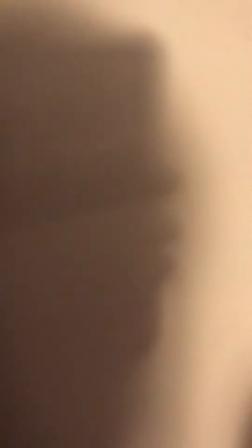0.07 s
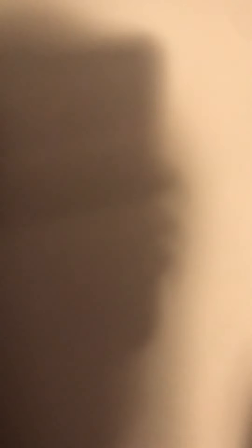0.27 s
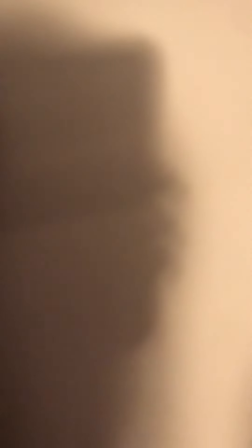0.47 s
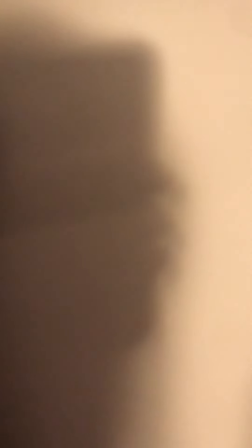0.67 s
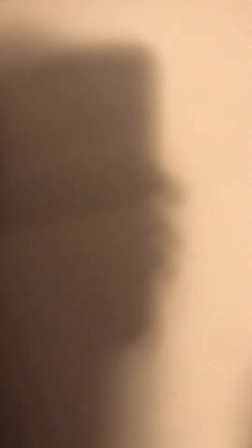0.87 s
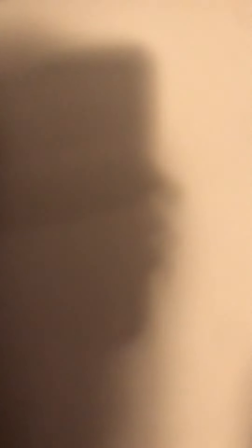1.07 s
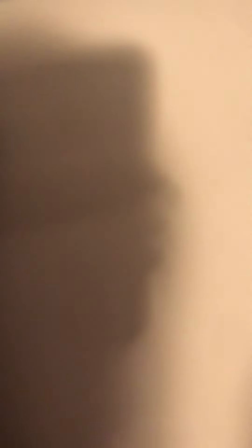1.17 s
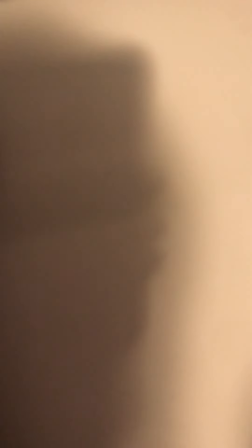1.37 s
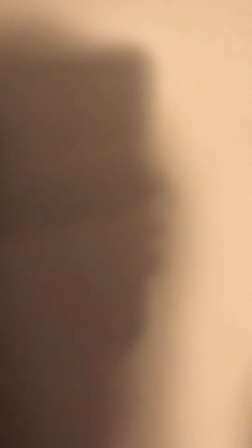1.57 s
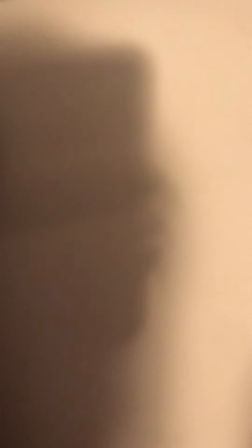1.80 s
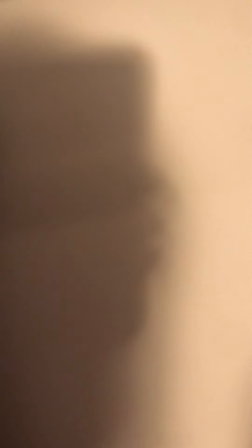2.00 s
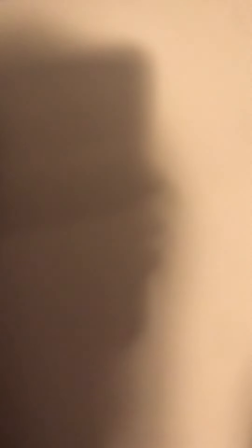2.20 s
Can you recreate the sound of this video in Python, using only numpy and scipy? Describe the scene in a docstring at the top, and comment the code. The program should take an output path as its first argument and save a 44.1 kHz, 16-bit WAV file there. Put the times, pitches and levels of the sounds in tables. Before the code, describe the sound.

Small magnets clack sharply onto a hard, briefly ringing panel at about 0.25 seconds, loudest near 0.3, then bounce faster and softer until 0.55 with a bright, gritty crackle. At 1.15 one is set down softly and slides with a short scrape, snapping onto the others around 1.55 in a quickening metallic chatter. Faint handling ticks follow until 2.2, all close by over a small room's low hum.

```python
"""Small magnets clack onto a hard panel and bounce to rest, close by in a small room.
Each hit makes the panel ring, and a fine, bright, gritty crackle trails the clacks.
One magnet is set down and slid along, catching on the surface, until it snaps onto the others
with a quickening metallic chatter. Faint handling taps follow over a low room hum."""
import sys
import numpy as np
from scipy import signal
from scipy.fft import rfft, irfft
from scipy.io import wavfile

SR = 44100
rng = np.random.default_rng(int(sys.argv[2]) if len(sys.argv) > 2 else 0)


def output_pcm(signal):
    """Save a mono or channel-first signal as 16-bit PCM at the path in sys.argv[1].

    Samples are clipped to [-1, 1] before scaling.
    """
    pcm = np.clip(np.atleast_2d(signal).T, -1, 1) * 32767
    wavfile.write(sys.argv[1], SR, np.round(pcm).astype(np.int16))


N = 99048
TAIL = int(.8 * SR)  # samples allowed for a ring or an echo to die away


def amp(db):
    """Turn decibels (dB) into a number to multiply a sound by."""
    return 10 ** (np.asarray(db) / 20)


def unit(x):
    """Scale a sound so its average power is 1."""
    return x / np.sqrt(np.mean(x ** 2))


def along(hz, points):
    """Read between (Hz, value) points, giving every octave equal space."""
    freqs, values = np.array(points, float).T
    return np.interp(np.log(np.maximum(hz, 1)), np.log(freqs), values)


def through(x, response):
    """Give every sample of a sound the same ring or echo."""
    return signal.fftconvolve(x, response)[:len(x)]


def tone(x, points, size=4096):
    """Turn bass and treble up or down, following (Hz, dB) points."""
    gains = amp(along(np.fft.rfftfreq(size, 1 / SR), points))
    # build the shortest click that has this tone
    cepstrum = irfft(np.log(gains))
    cepstrum[1:size // 2] *= 2
    cepstrum[size // 2 + 1:] = 0
    click = irfft(np.exp(rfft(cepstrum)))
    return through(x, click)


def add(out, start, x):
    """Mix x into out at a start time in seconds."""
    i = int(np.clip(round(start * SR), 0, len(out) - 1))
    out[i:i + len(x)] += x[:len(out) - i]


def fade(fade_s):
    """A curve with total energy 1 that drops 60 dB over its fade time."""
    curve = np.exp(-np.log(1000) * np.arange(TAIL) / SR / fade_s)
    return curve / np.sqrt(np.sum(curve ** 2))


def ring(notes):
    """A struck object rings with several notes, each fading at its own speed."""
    t = np.arange(TAIL) / SR
    return sum(amp(db) * np.sqrt(2) * fade(fade_s) * np.cos(2 * np.pi * hz * t)
               for hz, db, fade_s in notes)


def magnet_ring(notes, hz):
    """A small magnet rings at multiples of its main pitch."""
    return ring([(k * hz, db, fade_s) for k, db, fade_s in notes if k * hz < SR / 2])


def clatter(fade_s):
    """Countless short notes blur into a quick burst of noise."""
    return fade(fade_s) * rng.standard_normal(TAIL)


def direct():
    """The sound that comes straight to the microphone."""
    return signal.unit_impulse(TAIL)


def echoes(table):
    """Nearby surfaces each send back one late copy of the sound."""
    out = np.zeros(TAIL)
    for ms, db in table:
        add(out, ms / 1000, amp([db]))
    return out


# The tone of the room's steady noise. Each row: frequency in Hz, relative level in dB.
BACKGROUND_TONE = [(25, -24), (40, -14), (58, -3), (90, -6), (135, -5), (190, -11), (300, -13.5),
                   (500, -24), (1200, -24), (3000, -28), (8000, -31.5), (16000, -36)]

def background(noise_db=-68, hum_hz=58, hum_db=-70.5):
    """Quiet room noise with a low hum."""
    noise = unit(tone(rng.standard_normal(N), BACKGROUND_TONE))
    hum = np.sqrt(2) * np.sin(2 * np.pi * hum_hz * np.arange(N) / SR)
    return amp(noise_db) * noise + amp(hum_db) * hum


# How long sound lingers in the room. Each row: frequency in Hz, fade time in seconds.
ROOM_FADES = [(100, .42), (220, .27), (450, .24), (900, .27), (2000, .29), (4000, .26), (8000, .19),
              (15000, .14)]

def room(delay_s=.0026, rise_s=.004):
    """Echoes from the walls blend into a tail whose treble dies first."""
    noise = rfft(rng.standard_normal(TAIL))
    hz = np.fft.rfftfreq(TAIL, 1 / SR)
    centres, fades = zip(*ROOM_FADES)
    tail = np.zeros(TAIL)
    for share, fade_s in zip(np.eye(len(centres)), fades):
        band = along(hz, list(zip(centres, share)))
        tail += irfft(noise * band, TAIL) * fade(fade_s)
    elapsed = np.maximum(np.arange(TAIL) / SR - delay_s, 0)
    return tail * (1 - np.exp(-elapsed / rise_s))


# Magnets shifting between the fingers. Each row: start in seconds, level in dB, main pitch in Hz.
TICKS = [(1.3328, -27, 3040), (1.73, -36, 2980), (1.7879, -30, 3120), (2.007, -35.5, 3005),
         (2.092, -36.5, 2920)]
# The ring of a tick. Each row: multiple of the main pitch, level in dB, fade time in seconds.
TICK_NOTES = [(.4, -6, 0.0085), (1, 0, 0.0061), (1.25, -21.5, 0.0085), (1.75, -19.5, 0.0047)]

def ticks(walls, graze_s=.041, room_db=-8):
    """Magnets graze each other and ring briefly."""
    out = np.zeros(N)
    for start, db, hz in TICKS:
        graze = clatter(graze_s) + amp(room_db) * walls
        add(out, start, amp(db) * through(graze, magnet_ring(TICK_NOTES, hz)))
    return out


# How the sliding swells and fades. Each row: time in seconds, level in dB.
SLIDE_LEVELS = [(0, -67.5), (.1, -86), (.21, -71.5), (.24, -60.5), (.3, -81), (1.089, -80.5),
                (1.135, -64.5), (1.25, -70), (1.299, -56.5), (1.412, -66), (1.428, -57), (1.471, -50.5),
                (1.495, -51), (1.528, -37), (1.58, -37), (1.62, -50), (1.7, -77), (1.799, -71.5),
                (1.921, -78.5), (1.987, -61.5), (2.06, -74.5), (2.111, -63), (2.19, -70), (2.25, -59)]
# The tone of the rubbing. Each row: frequency in Hz, relative level in dB.
SLIDE_TONE = [(60, -20), (250, 1.5), (380, 1), (620, 1.5), (850, 5), (1500, -6), (2500, -14.5), (3400, -17),
              (3950, -11.5), (4800, -22.5), (7000, -15.5), (8500, -22), (11500, -21), (16000, -26.5)]
# The sliding magnet's ring. Each row: pitch in Hz, relative level in dB, fade time in seconds.
SLIDE_NOTES = [(385, -6, .07), (610, -5, .05), (1500, -4, .03), (3950, -11, .02), (7000, -17, .015)]

def slide(catches_per_s=890, scatter_db=1, hiss_db=-6, ring_db=-3, rub_db=-3):
    """A magnet scrapes along: many tiny catches set it ringing over a smooth rub."""
    catches = (rng.random(N) < catches_per_s / SR) * rng.standard_normal(N)
    catches *= amp(scatter_db * rng.exponential(size=N))
    force = unit(catches) + amp(hiss_db) * rng.standard_normal(N)
    rub = amp(rub_db) * unit(tone(force, SLIDE_TONE))
    ringing = amp(ring_db) * unit(through(force, ring(SLIDE_NOTES)))
    times, levels = zip(*SLIDE_LEVELS)
    return (rub + ringing) * amp(np.interp(np.arange(N) / SR, times, levels))


# How the grit swells and fades. Each row: time in seconds, level in dB.
GRIT_LEVELS = [(0.334, -73), (.345, -40), (.37, -49), (.395, -38.5), (.43, -64), (.48, -85), (.505, -59),
               (.535, -64), (.56, -90)]
# The grit's bright tone. Each row: frequency in Hz, relative level in dB.
GRIT_TONE = [(1000, -24.5), (4000, -4), (6800, 0), (9000, -5.5), (11500, -1), (13500, -3), (16000, -11.5)]

def grit(grains_per_s=1100, grain_fade_s=.014):
    """A fine, bright, gritty crackle trails the clacks."""
    grains = (rng.random(N) < grains_per_s / SR) * rng.standard_normal(N)
    crackle = unit(tone(through(grains, clatter(grain_fade_s)), GRIT_TONE))
    times, levels = zip(*GRIT_LEVELS)
    return crackle * amp(np.interp(np.arange(N) / SR, times, levels, left=-np.inf, right=-np.inf))


def panel_ripple(delay_at_1khz_s=.000701, size=4096):
    """Ripples in the panel carry treble faster than bass, which smears each hit a little."""
    hz = np.fft.rfftfreq(size, 1 / SR)
    phase = 4 * np.pi * delay_at_1khz_s * np.sqrt(1000 * hz)
    return irfft(np.exp(-1j * phase))[:size // 4]


# What echoes and clatter lose. Each row: frequency in Hz, level change in dB.
ECHO_TONE = [(3000, -2), (5000, -1.5), (8000, -5.5), (15000, -6.5)]

def hits(table, bands_hz, body, overall_tone, clatter_db, clatter_s):
    """Each hit, hard or soft, sets off the body's ring and a short clatter."""
    out = np.zeros(N)
    for start, *levels in table:
        burst = amp(clatter_db) * tone(clatter(clatter_s), ECHO_TONE)
        add(out, start, tone(body + burst, list(zip(bands_hz, levels))))
    return tone(through(out, panel_ripple()), overall_tone)


# Soft taps in the hand or on the panel. Each row: start in seconds, then a level in dB for each band.
TAPS = [(0.0750, -26.5, -21, -40, -54), (0.2432, 5, 10, 6, -10), (0.2648, 8.5, 7.5, 1, -14),
        (1.1549, -1.5, 5.5, -11.5, -8), (1.3120, -41, -33, -37, -35), (1.3330, -14, -16, -21.5, -68),
        (1.3610, -8, -9, -29, -31.5), (1.4430, -31, -10.5, -27, -44.5), (1.4640, -7, -4.5, -30.5, -12),
        (1.5432, -1.5, 11, 4, -45), (1.5550, 7, 3.5, 1, -11), (1.5625, -2.5, 10, 4, -3),
        (1.5745, 6.5, 8, 3.5, -13), (1.5815, 8.5, 7, -2, -36), (1.5890, 0, 11, -19, -28),
        (1.6390, -8.5, -1.5, -30, -30), (1.7270, -46, -19, -36, -48), (2.1215, -26, -15.5, -43, -42),
        (2.2260, -16, -19, -40.5, -27)]
# The four bands of a tap in Hz, from bass to treble.
TAP_BANDS_HZ = [220, 1100, 3200, 9000]
# A tapped magnet and its support ringing. Each row: pitch in Hz, level in dB, fade time in seconds.
TAP_NOTES = [(338, -25, 0.22), (375, -15, 0.24), (602, -23.5, 0.54), (688, -29.5, 0.46),
             (914.4, -24.5, 0.31), (1481, -26.5, 0.059), (1780, -25, 0.068), (3864, -5.5, 0.025),
             (4070, -10, .04), (6860, -7, .04)]
# The tone all taps share. Each row: frequency in Hz, level change in dB.
TAP_TONE = [(40, -15.5), (120, -4), (350, -1), (900, 0.5), (1800, 6), (2700, -2.5), (4000, -5),
            (5000, -10.5), (7000, -6.5), (11000, -8), (16000, -18)]

def taps(walls, direct_db=-14, room_db=-7):
    """Magnets give duller knocks as they are set down, jump and are handled."""
    body = amp(direct_db) * direct() + ring(TAP_NOTES) + amp(room_db) * walls
    return hits(TAPS, TAP_BANDS_HZ, body, TAP_TONE, clatter_db=0, clatter_s=.058)


# Metal meeting metal. Each row: start in seconds, level in dB, main pitch in Hz.
SNAPS = [(0.2643, 6, 9500), (0.2655, 6.5, 11400), (1.5315, 13, 6840), (1.5471, 10.5, 6650),
         (1.5582, 9.5, 6880), (1.5667, 4.5, 6830), (1.5722, 4, 6900), (1.576, 1.5, 6770),
         (1.5820, -4, 6730), (1.585, -6, 6900)]
# The ring of a snap. Each row: multiple of the main pitch, level in dB, fade time in seconds.
SNAP_NOTES = [(.68, -16, .003), (.88, -11, 0.0031), (1.02, -9, 0.0034), (1.26, -18.5, 0.0057),
              (1.61, -21, 0.0052), (1.95, -25.5, .002)]
# Little low sound leaves a magnet. Each row: multiple of the main pitch, level change in dB.
SNAP_LOW_CUT = [(.08, -12), (.42, -12), (.62, -1), (.9, 0.5)]
# Echoes from nearby surfaces. Each row: delay in milliseconds, level in dB.
SNAP_ECHOES = [(2.3, -16.5), (3.4, -11.5)]
# The tone all snaps share. Each row: frequency in Hz, level change in dB.
SNAP_TONE = [(7000, -4.5), (11500, -4), (13500, -4.5), (16000, -12)]

def snaps(walls, clatter_db=-13, clatter_s=.03, room_db=-11):
    """Two magnets snap together and chatter in very short, bright ticks."""
    out = np.zeros(N)
    near = direct() + echoes(SNAP_ECHOES)
    for start, db, hz in SNAPS:
        click = near + amp(clatter_db) * clatter(clatter_s) + amp(room_db) * walls
        thin_click = tone(click, [(k * hz, level) for k, level in SNAP_LOW_CUT])
        add(out, start, amp(db) * through(thin_click, magnet_ring(SNAP_NOTES, hz)))
    return tone(out, SNAP_TONE)


# Hard hits and bounces on the panel. Each row: start in seconds, then a level in dB for each band.
CLACKS = [(0.2428, 15.5, 15, -3.5, -9, 3.5), (0.2550, 6, 6.5, -3, -10, -13.5),
          (0.2640, 15.5, 8.5, -0.5, -12.5, -2.5), (0.3280, 17.5, 18, 22, 12.5, 4),
          (0.3776, 12.5, 15, 12, 1, -4.5), (0.4200, 0, -2.5, 7.5, -15, -15.5), (0.4228, 11, 9, 7, -1, -12),
          (0.4660, 3.5, 4.5, 2, -13, -20), (0.4926, 1, 5, 9, 1, -12), (0.5045, -27.5, 1.5, -6, -7, -49),
          (0.5160, -16.5, 3.5, -4, -14, -29.5), (0.5205, -1, -2.5, -1, -12, -44),
          (0.5360, 1.5, -49, -35, -36, -34)]
# The five bands of a clack in Hz, from bass to treble.
CLACK_BANDS_HZ = [220, 1100, 3200, 5300, 9500]
# The panel and its magnets ringing. Each row: pitch in Hz, level in dB, fade time in seconds.
PANEL_NOTES = [(137, -26, .45), (268, -23, .26), (350, -26, .24), (594, -24, .24), (686, -26, .24),
               (1087, -27, .27), (1244, -27, .22), (1549, -25, .27), (1847, -24, .27), (2372, -28, .28),
               (2573, -26, .26), (2891, -27, .24), (3176, -24, .22), (2826, -16, .035), (3750, -14, .04),
               (4220, -16, .025), (6400, -12, .012), (9700, -14, .012), (11300, -13, .012),
               (13500, -14, .01)]
# Echoes from nearby surfaces. Each row: delay in milliseconds, level in dB.
CLACK_ECHOES = [(1.0, 0), (2.65, 3.5), (4.75, -9.5), (13.4, -9), (16.6, -10), (19.2, -12.5)]
# What the panel sends into the room. Each row: frequency in Hz, level change in dB.
CLACK_ROOM_TONE = [(150, -0.5), (500, 6), (1500, -0.5), (4000, -3), (6000, -0.5), (11500, 3), (15000, -3.5)]
# The tone all clacks share. Each row: frequency in Hz, level change in dB.
CLACK_TONE = [(35, -21.5), (70, -7), (140, -0.5), (460, -1.5), (700, 1.5), (2000, 2), (4100, -2),
              (4800, -9), (6500, -4.5), (8500, -4), (11500, -6.5), (14500, -12), (16000, -3.5)]

def clacks(walls, near_db=-9, crack_db=-11, crack_s=.006, room_db=-6):
    """Magnets hit the panel with a sharp crack, set it ringing and bounce ever faster."""
    near = amp(near_db) * (direct() + tone(echoes(CLACK_ECHOES), ECHO_TONE))
    crack = amp(crack_db) * clatter(crack_s)
    far = amp(room_db) * tone(walls, CLACK_ROOM_TONE)
    body = near + crack + ring(PANEL_NOTES) + far
    return hits(CLACKS, CLACK_BANDS_HZ, body, CLACK_TONE, clatter_db=1, clatter_s=.081)


def scene():
    """Add up all the sounds in one room, as one channel."""
    walls = room()
    foreground = clacks(walls) + grit() + taps(walls) + snaps(walls) + ticks(walls) + slide()
    return (foreground + background())[None]


def record(dry, top_hz=15800):
    """Flatten any peaks beyond full scale, then cut the highest treble."""
    treble_cut = signal.ellip(10, .2, 70, top_hz, fs=SR, output="sos")
    return signal.sosfilt(treble_cut, np.clip(dry, -1, 1))


dry = scene()
out = record(dry)
output_pcm(out)
```